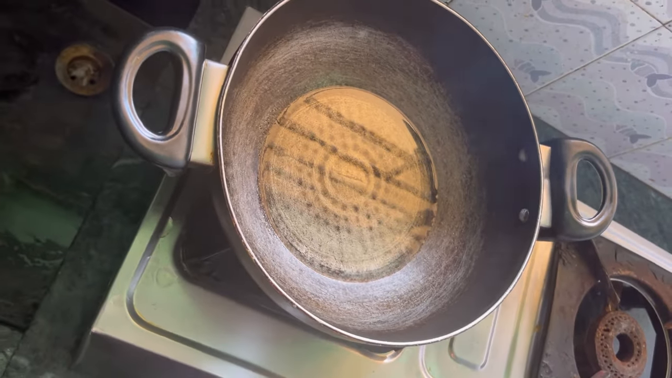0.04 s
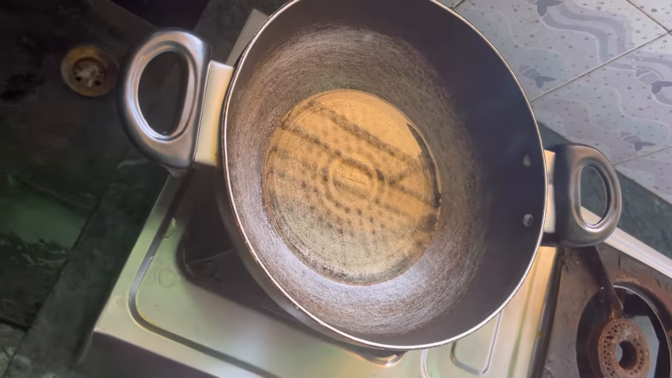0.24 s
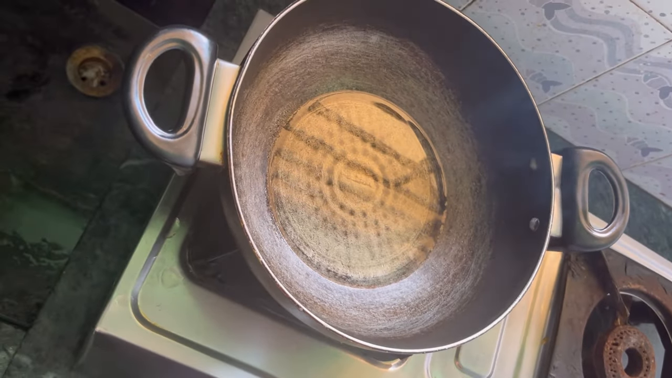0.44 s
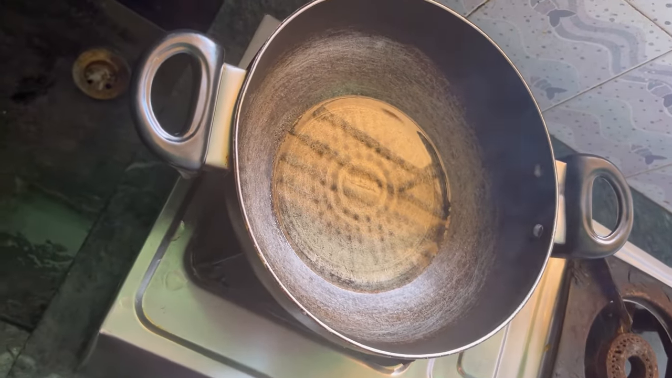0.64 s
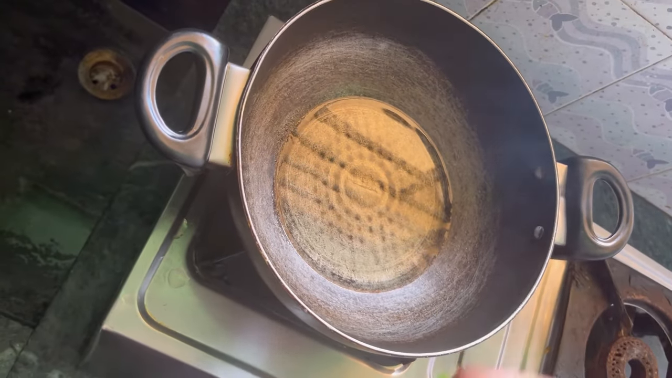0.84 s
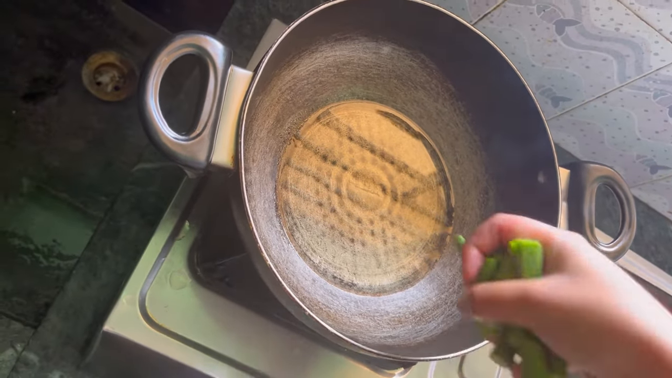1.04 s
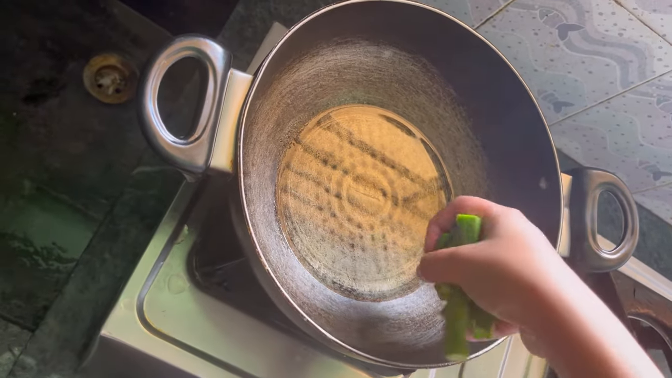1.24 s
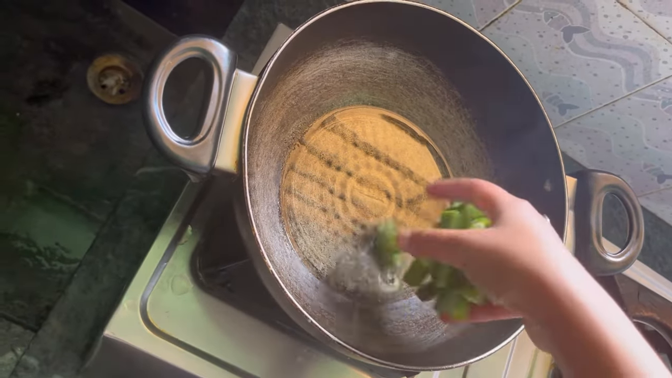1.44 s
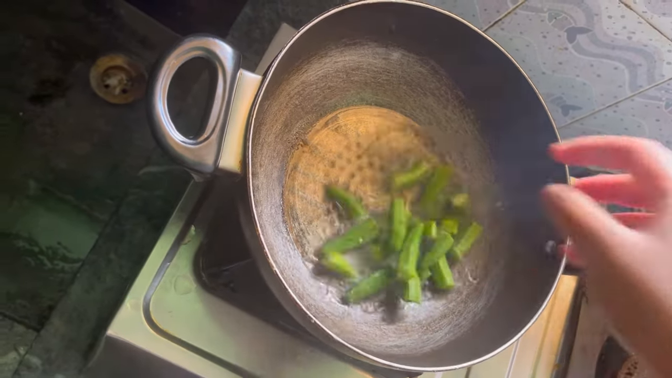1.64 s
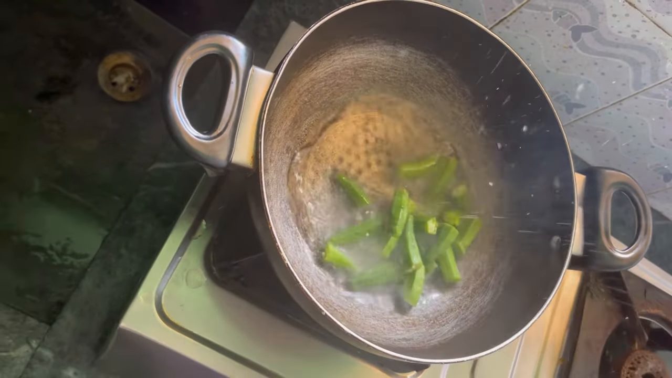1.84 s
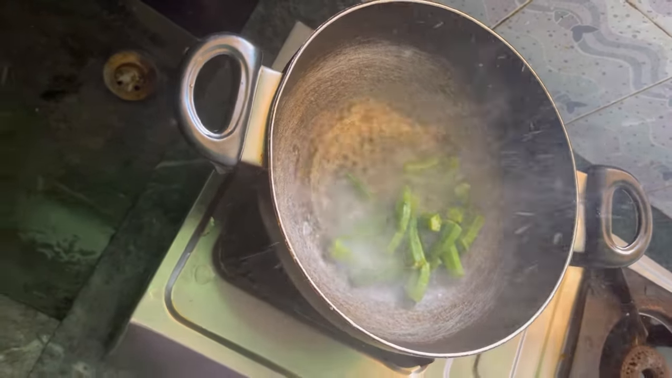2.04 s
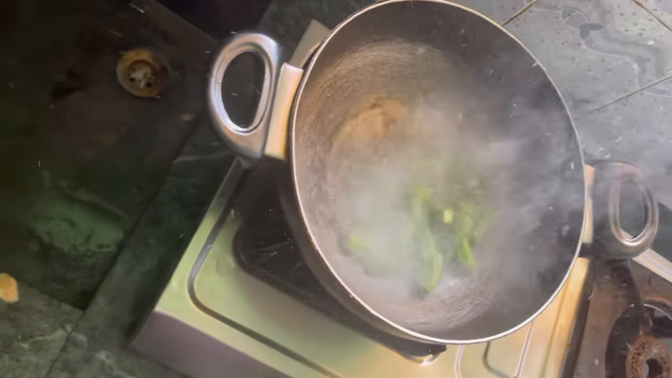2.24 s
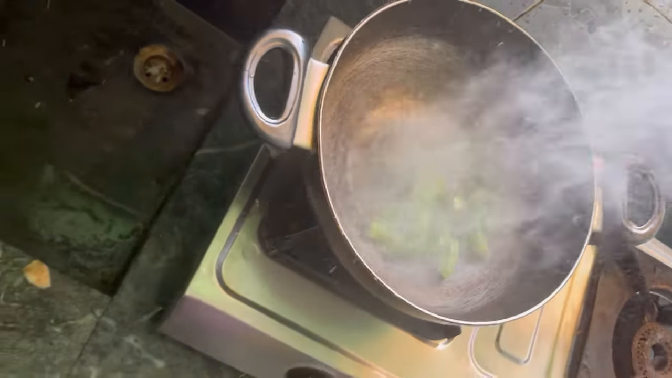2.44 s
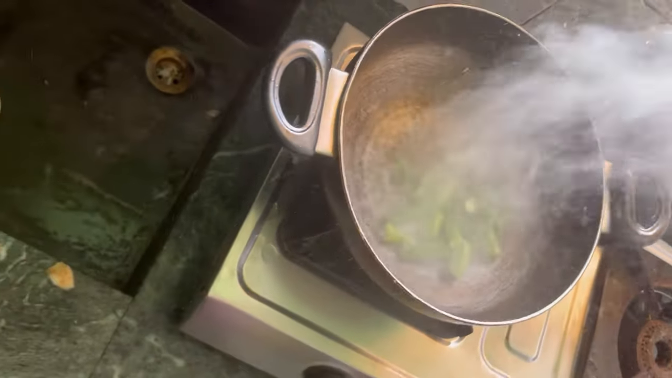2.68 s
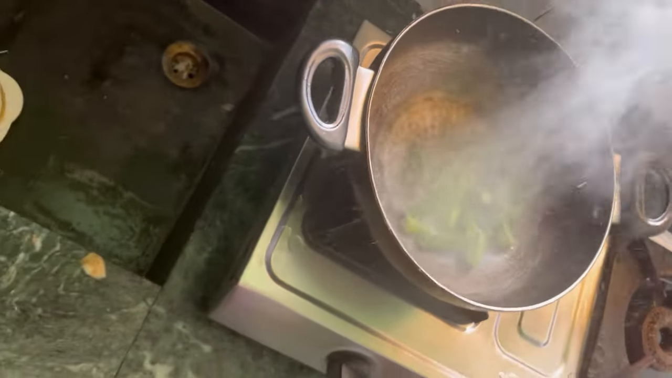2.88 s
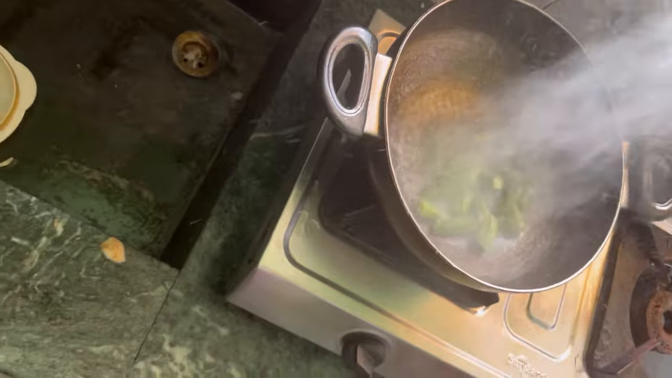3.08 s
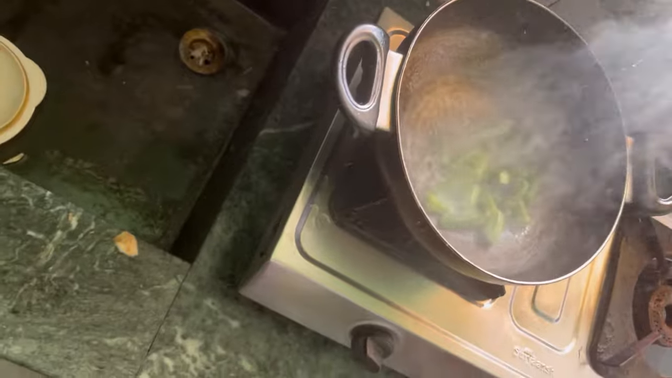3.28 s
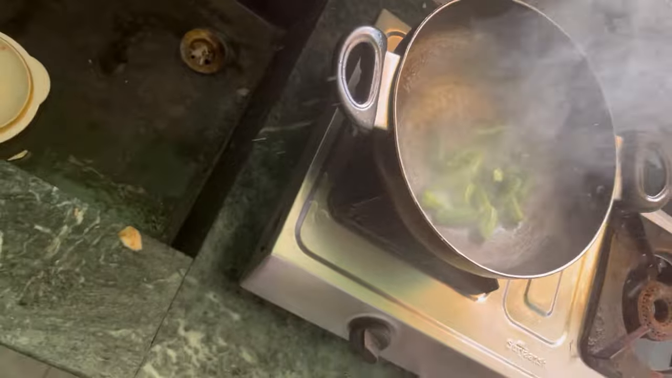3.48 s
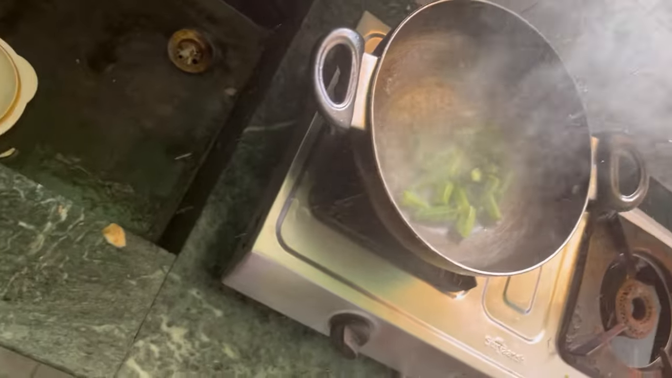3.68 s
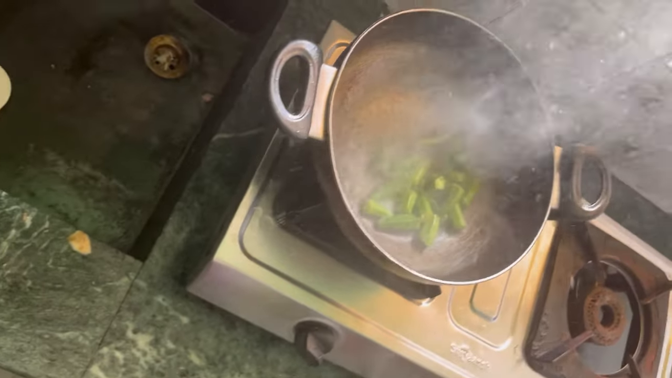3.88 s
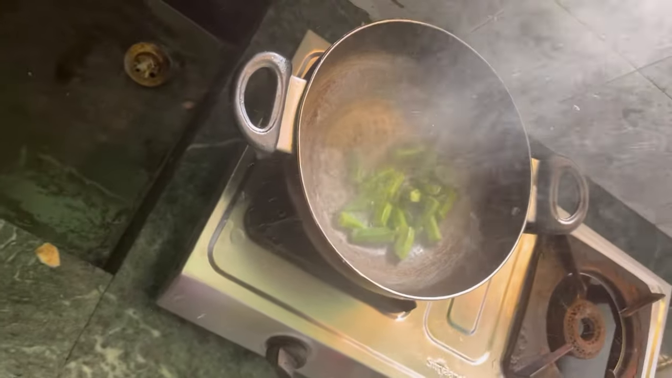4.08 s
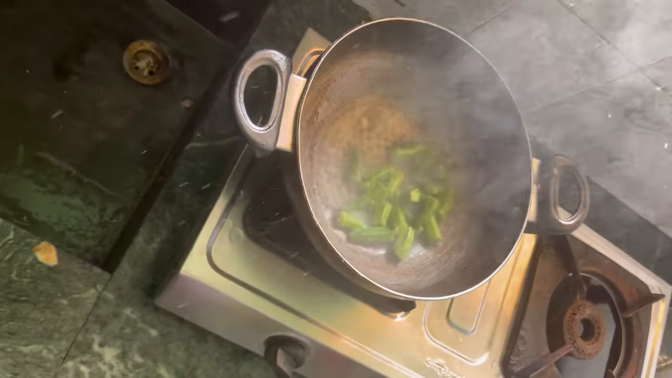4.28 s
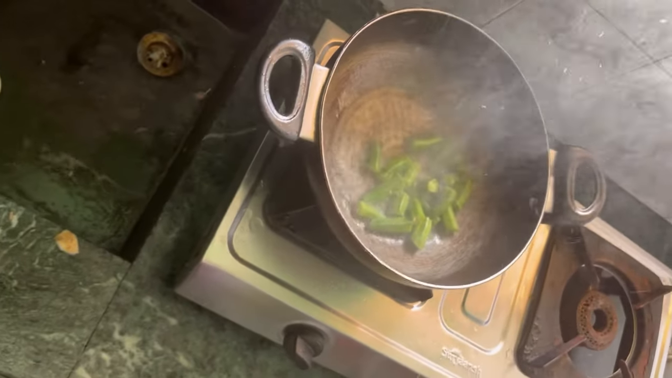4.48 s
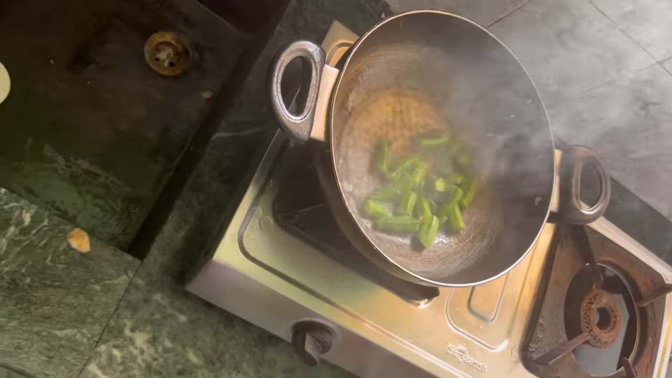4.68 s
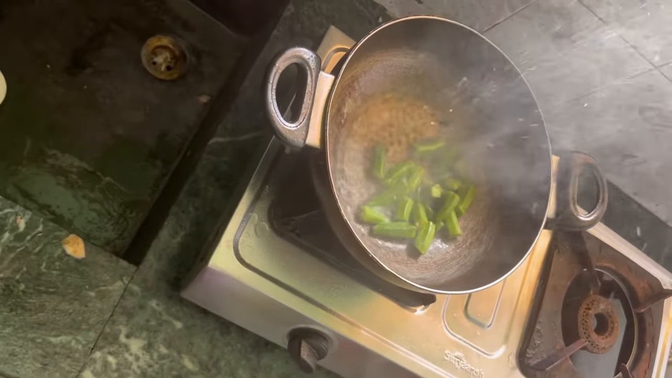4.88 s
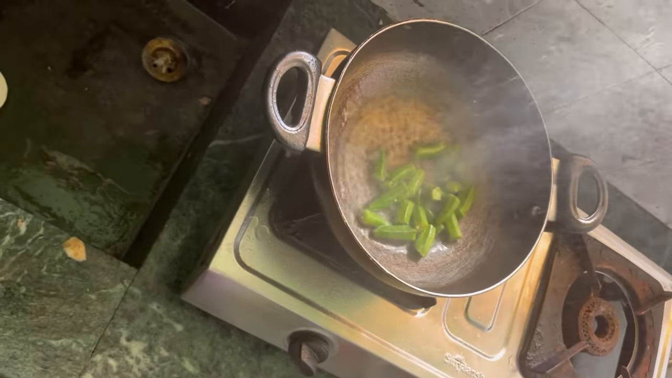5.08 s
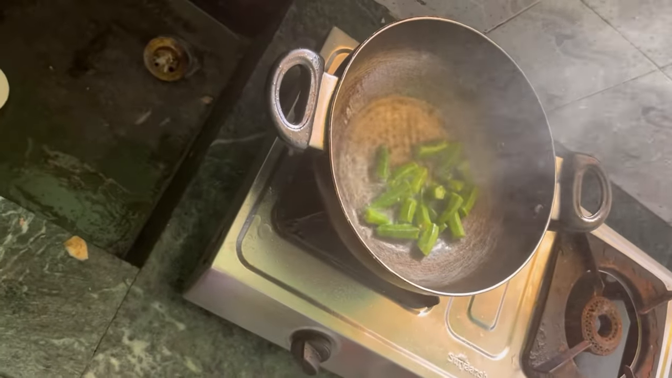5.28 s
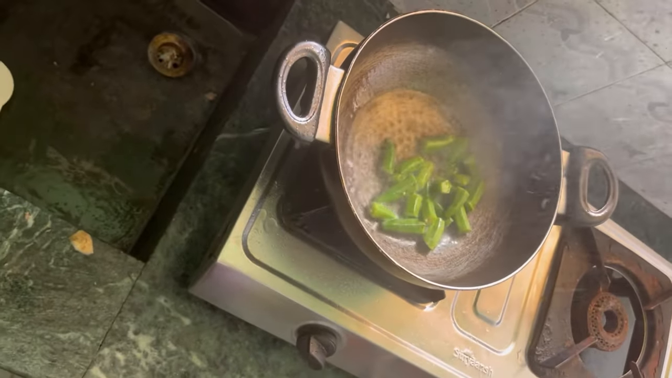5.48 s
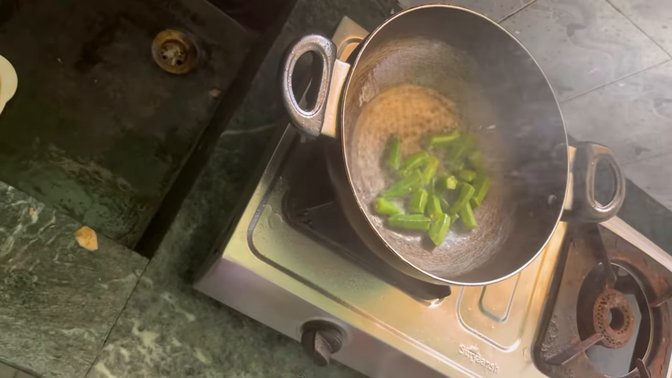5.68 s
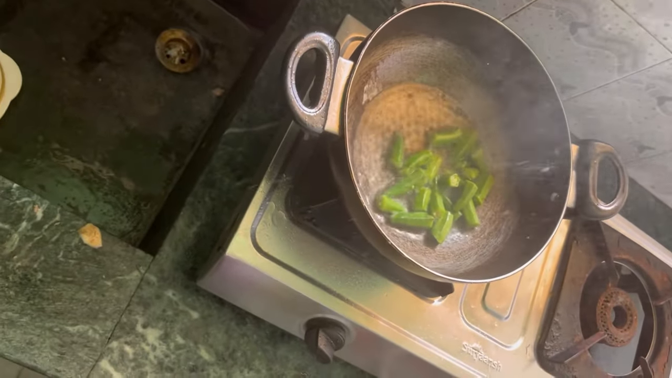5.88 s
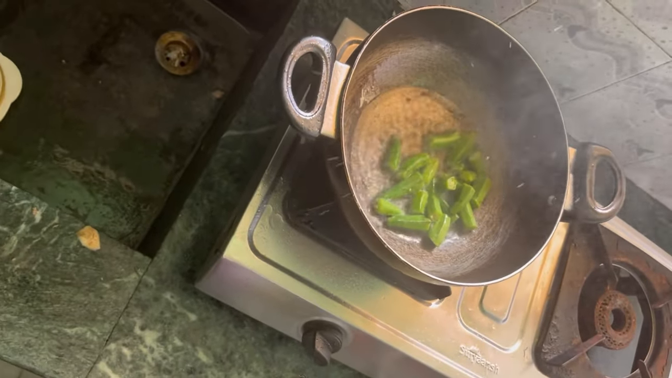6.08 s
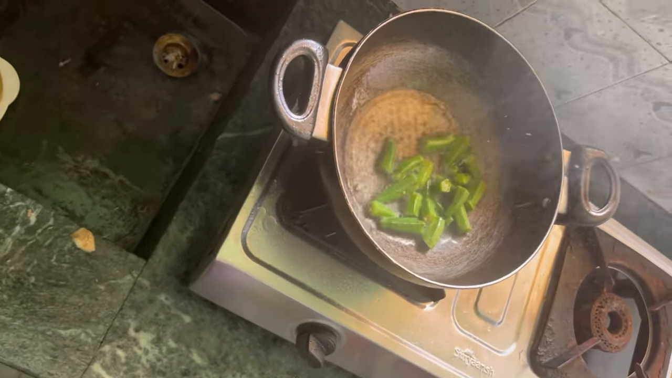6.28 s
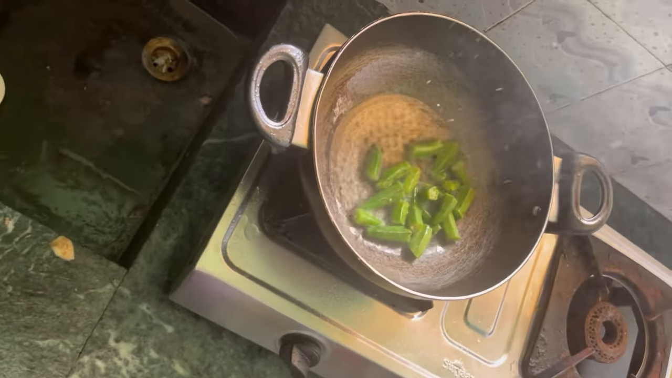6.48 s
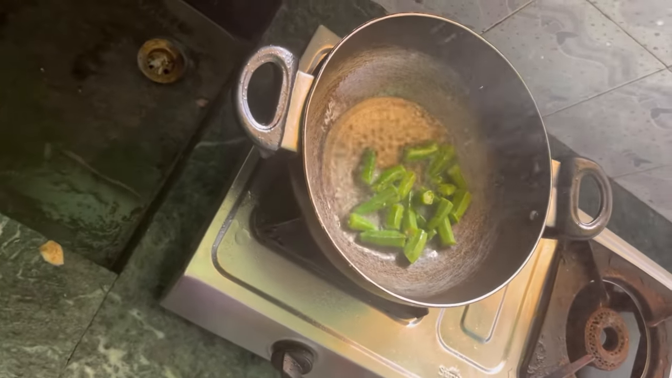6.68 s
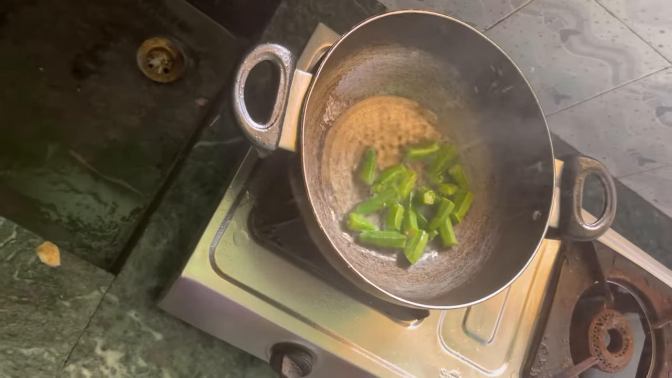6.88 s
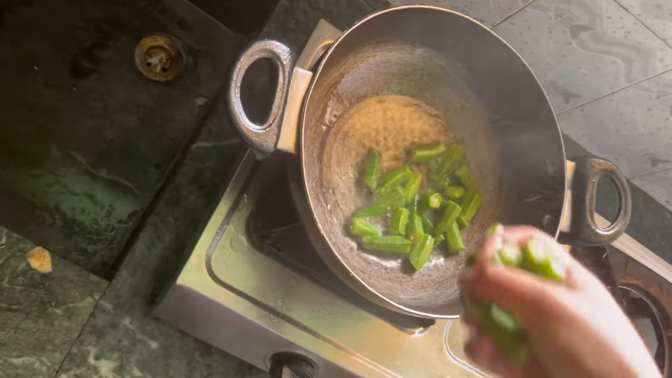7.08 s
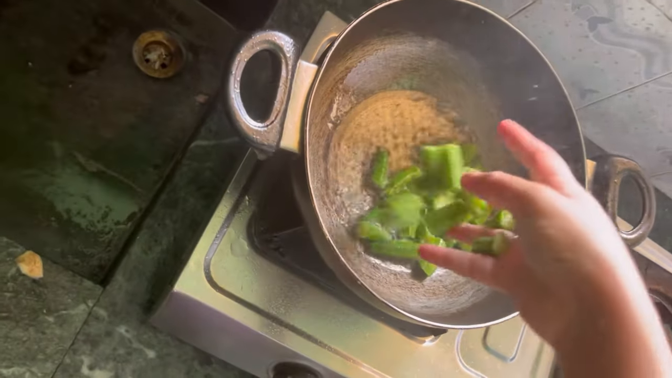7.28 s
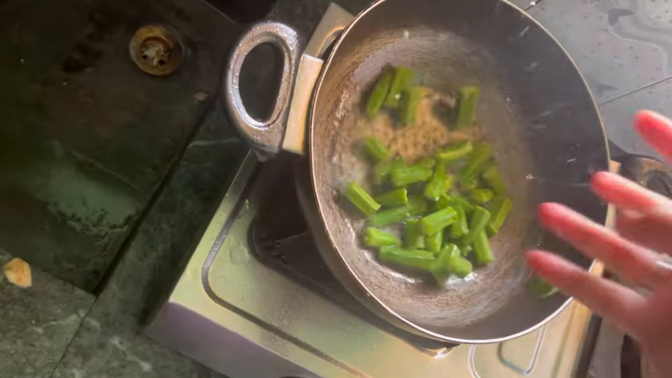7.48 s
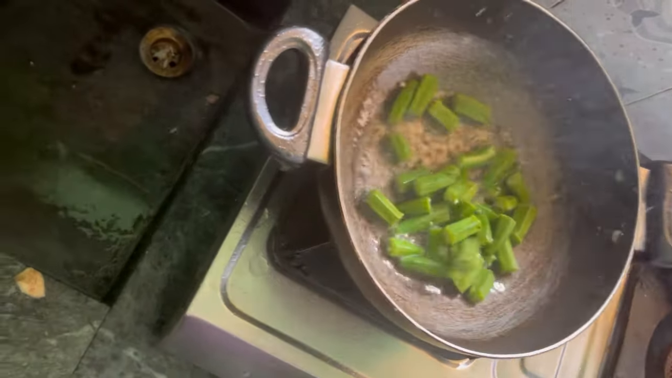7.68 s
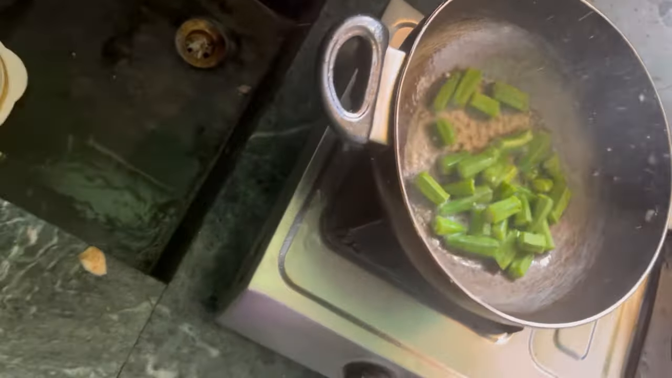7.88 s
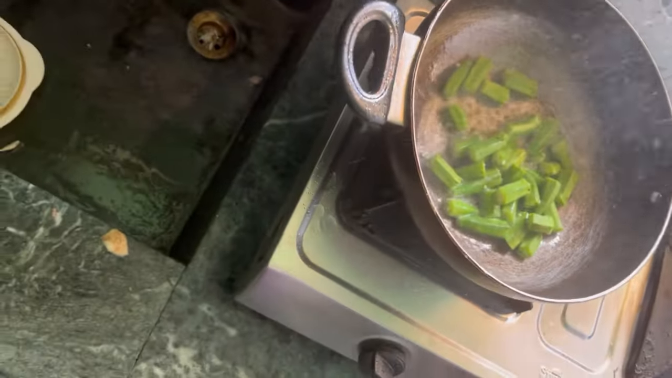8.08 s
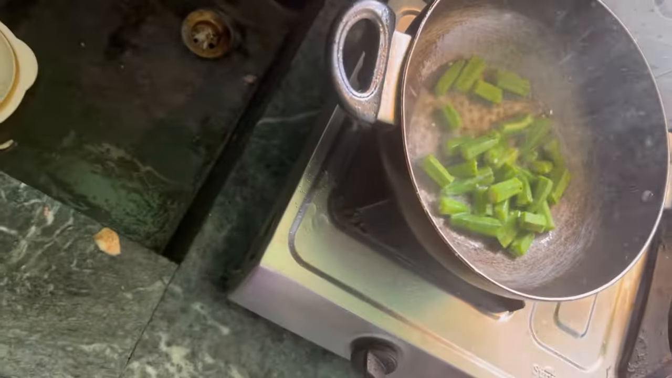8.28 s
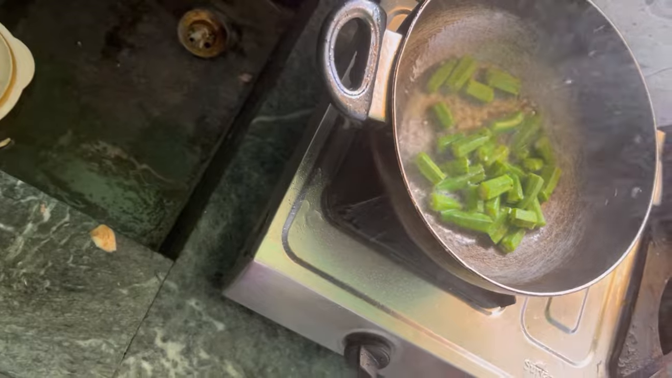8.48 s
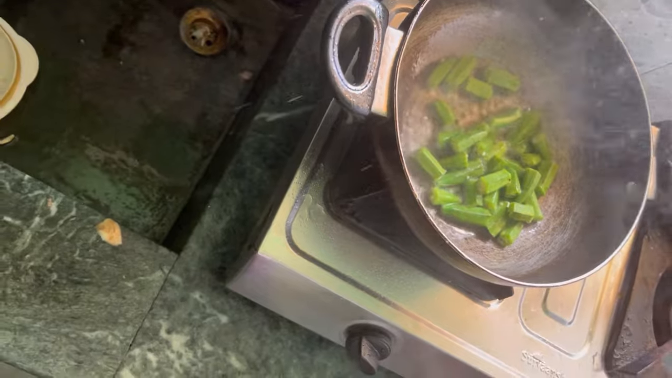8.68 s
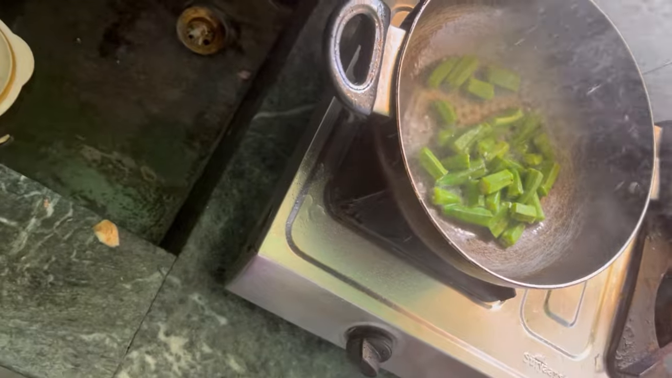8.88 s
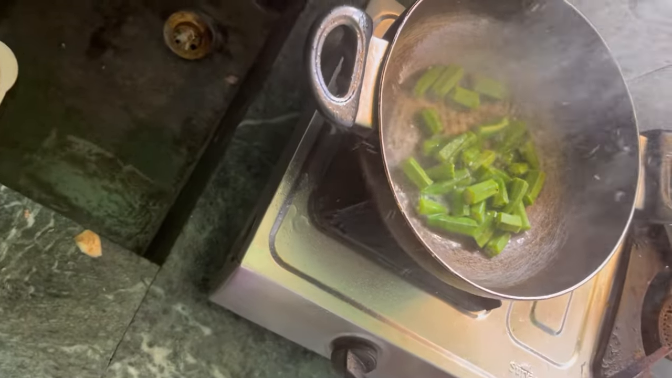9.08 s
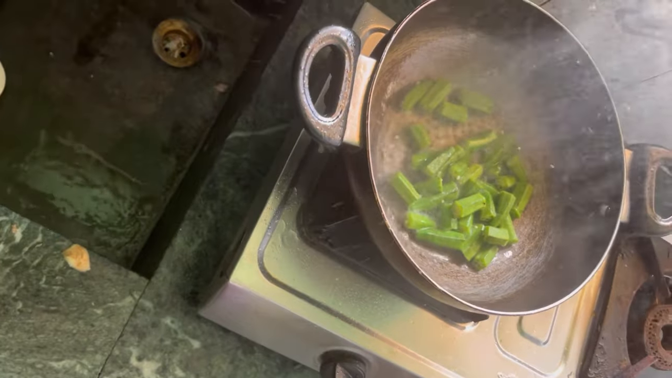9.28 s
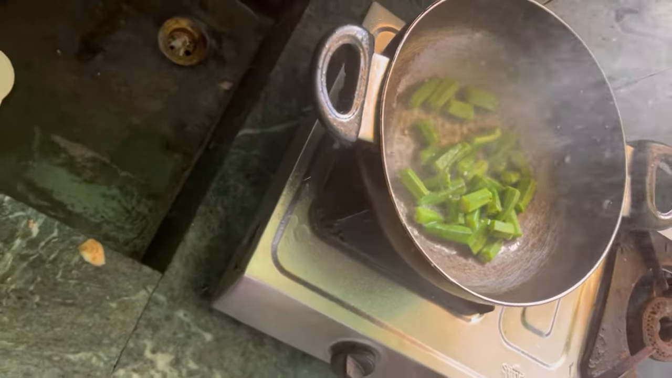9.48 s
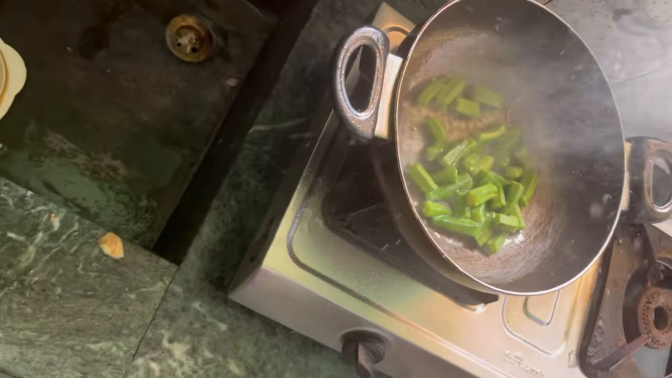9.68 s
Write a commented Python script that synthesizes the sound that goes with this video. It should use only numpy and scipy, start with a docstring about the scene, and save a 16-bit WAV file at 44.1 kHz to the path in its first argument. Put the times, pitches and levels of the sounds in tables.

```python
"""Wet okra frying: two handfuls are dropped into hot oil in a round metal pan on a gas stove.
Water flashes to steam: thousands of tiny noise bursts a second fizz, larger bubbles seethe below
and the finest sparkle above, while single drops spit with a crack, a ringing plop and a spray.
Soft bumps, a faint gas whine and a low kitchen rumble of shaped noise lie behind them.
A handheld pair of microphone ports hears the pan from above."""
import sys
import numpy as np
from scipy import signal
from scipy.fft import rfft, irfft, next_fast_len
from scipy.io import wavfile
from scipy.ndimage import uniform_filter1d

SR = 44100
rng = np.random.default_rng(int(sys.argv[2]) if len(sys.argv) > 2 else 0)


def store_wav(level_fs):
    """Save 16-bit WAV to argv[1]."""
    pcm = np.round(np.clip(np.atleast_2d(level_fs), -1, 1) * 32767)
    wavfile.write(sys.argv[1], SR, pcm.T.astype(np.int16))


N = 429534

# Vigour of the frying: first drops, one handful, then another. Each row: time in seconds,
# level of the fizz in dB before the spits stir it.
FRYING_LEVEL = [(1.408, -51), (1.418, -19), (1.432, -28), (1.447, -28.5), (1.542, -20.5), (1.555, -11.5),
                (1.576, -14), (1.62, -12.5), (1.7, -14.5), (2.05, -14.5), (2.3, -18), (3.05, -23.5),
                (3.7, -25), (4.6, -27.5), (5.0, -28.5), (6.0, -28.5), (7.2, -29), (7.36, -28.5), (7.5, -26),
                (8.5, -24), (9.3, -24), (9.74, -25)]
# Colours of the tiny bursts, the larger bubbles and the finest bursts; only their shape counts.
# Each row: frequency in Hz, relative density in dB per Hz.
FIZZ_SPECTRUM = [(1500, -42.5), (2300, -7.5), (2700, -7), (3300, -7.5), (4300, -4), (5200, -1), (6800, 1.5),
                 (7700, -2), (8800, -12.5), (10000, -41), (12000, -36)]
SEETHE_SPECTRUM = [(150, -18), (300, -12.5), (500, -4), (800, -1), (1100, -2), (1500, 1), (2200, 0.5),
                   (3000, 0), (4500, -12.5)]
SPARKLE_SPECTRUM = [(5000, -45), (8000, -16), (9300, -6), (10200, -3), (11600, 0), (15000, 0), (16500, -3)]
# Single drops that spit. Each row: start in seconds, crack peak in dB, plop minus crack in dB,
# spray minus crack in dB, plop pitch in Hz.
SPITTING_DROPS = [(0.562, -35.5, 5, -20, 1940), (1.4804, -14, -15, 8, 2000), (1.5254, -11, -5, 9, 2210),
                  (2.02, -9, 2, -8, 1500), (2.303, -12, -7, -9, 1530), (2.5521, -9, -21, -6, 1510),
                  (2.681, -2, -14, -8, 2290), (3.377, -22, -5, -15, 1450), (3.457, -7, -13, -10, 930),
                  (3.7296, -10, -15, -14, 2160), (4.126, -15, 1.5, -4, 1360), (4.18, -11.5, -6, -11, 1950),
                  (4.2144, -25, -14, -11, 1360), (4.774, -16.5, 0, -11, 790), (4.7904, -20, -13, -9, 1690),
                  (5.0338, -3.5, -15, -21, 1320), (5.255, -4, -11, -24, 1380), (5.498, -20.5, 6, -2, 1840),
                  (5.5094, -17, -8, -1, 1970), (5.934, -21, 4, -8, 610), (6.035, -12, -4, -5, 1990),
                  (6.1375, -20, -18, 3, 1260), (6.1843, -10, -5.5, -13, 1300), (6.3986, -12, -6, -10, 1600),
                  (6.548, -13, -9, -15, 1890), (6.5725, -12, -19, -13, 1270), (6.8905, -13, -31, 3, 1670),
                  (7.1454, -8, -18, -7, 1430), (7.1682, -10.5, -8, 2, 800), (7.2349, -10.5, -1.5, -6, 756),
                  (7.2864, -14, -19, -2, 2010), (7.3125, -6.5, -8, -5, 2020), (7.3324, -11, -3, -6, 720),
                  (7.352, -10, 2.5, -12, 800), (7.3695, -3.5, -3, -12, 2120), (7.392, -11.5, 1, -12, 784),
                  (7.485, -18, -8, 12, 940), (7.662, -12, -5, 1, 1450), (7.74, -13, -4, -4, 1360),
                  (7.7573, -9, -15, -3, 2010), (7.9448, -10, -19, -6, 1660), (8.008, -12, -11, -11, 1350),
                  (8.1, -9, -12, -6, 1400), (8.148, -18, -7, 9, 2130), (8.4447, -13, -11, -8, 1250),
                  (8.5, -4.5, -2.5, -11, 1310), (8.632, -10, -13, -7, 1370), (8.644, -10, -3, -8, 1390),
                  (8.6537, -3, -13, -22, 900), (8.7254, -9, 0, -10, 865), (8.758, -15, 2, -11, 840),
                  (8.927, -7, -8, -11, 2070), (9.0415, -11, -4, -11, 850), (9.1, -11, 1, 2, 780),
                  (9.1267, -6, -10, -10, 2090), (9.3594, -3, -10, -2, 2020), (9.424, -7, -9, -11, 1770),
                  (9.5094, -10, -1, 4, 1560), (9.5791, -7, -20, -17, 2200)]
CALMEST_DB = -34   # frying below this level counts as this calm when its bursts and flares are set


def frying():
    """Seethe, fizz and sparkle surge together as pockets of water boil off; a harder boil is denser."""
    # The first small drops are thin; the fizz under 4.5 kHz fills in with the handful.
    # Each row: time in seconds, gain of that lower fizz in dB.
    low_fill = [(1.41, -8.5), (1.5, -2), (1.56, 0.5)]
    seethe_db, seethe_lag_s = -10, 0.05   # larger bubbles: level against the fizz, lag behind it
    sparkle_db, thin_sparkle = -4, 1      # level against the fizz, dB gained per dB of missing fill
    calm = 0.18                           # the harder the boil, the more its surges even out

    fizz_db = in_time(FRYING_LEVEL, left=-120)
    fill_db = in_time(low_fill)
    r = np.exp(-1 / (seethe_lag_s * SR))
    seethe_gain = from_db(seethe_db) * signal.lfilter([1 - r], [1, -r], from_db(fizz_db))
    sparkle_gain = from_db(fizz_db + sparkle_db - thin_sparkle * fill_db)

    busy = from_db(.8 * (np.maximum(fizz_db, CALMEST_DB) + 29))   # factor on the burst rates
    surge_db = (0.88 * drift(8.3) + 1.0 * drift(20.0)) / busy ** calm

    fizz = bursts(4000. * busy, 3.03, smooth=0.99, last_s=0.00024)
    fizz = colour(fizz * from_db(surge_db + 0.18 * drift(31.0)), FIZZ_SPECTRUM)
    lower = signal.sosfilt(signal.butter(2, 4500, fs=SR, output="sos"), fizz)
    fizz = fizz + (from_db(fill_db) - 1) * lower

    seethe = bursts(1500. * busy, 3.3, smooth=1.0, last_s=0.00052)
    seethe = colour(seethe * from_db(0.7 * surge_db + 0.9 * drift(26.0)), SEETHE_SPECTRUM)

    sparkle = bursts(3500. * busy, 3.95, smooth=0.9, last_s=0.00017)
    sparkle = colour(sparkle * from_db(0.47 * surge_db + 1.26 * drift(23.0)), SPARKLE_SPECTRUM)

    layers = (from_db(fizz_db), fizz), (seethe_gain, in_room(seethe)), (sparkle_gain, sparkle)
    # slow changes of level are evened out, so that the gains alone set them
    return flares(fizz_db) * sum(gain * rms_one(x / slow_level(x)) for gain, x in layers)


def bursts(per_s, spread_db, smooth, last_s):
    """Uneven random noise flashes, power dying by 1/e in last_s, over smooth noise; two unrelated draws."""
    sizes = from_db(spread_db * np.minimum(rng.exponential(1, N), 6))
    chance = np.clip(per_s / SR, 0, 1)
    struck = rng.random(N) < chance
    power = sizes ** 2 * struck / chance   # rarer bursts are stronger, so the mean power holds
    decay = np.exp(-1 / (last_s * SR))
    flashes = np.sqrt(signal.lfilter([1], [1, -decay], power + 1e-18))
    # both draws share one envelope of flashes
    return rms_one(flashes) * rng.standard_normal((2, N)) + smooth * rng.standard_normal((2, N))


def flares(fizz_db):
    """Gain on the frying: each spit stirs the oil and adds power that dies away."""
    flare_db, flare_s = -25., .035   # fizz added against the spit's peak, time to 1/e of the power
    s, peak_db = np.transpose(SPITTING_DROPS)[:2]
    kicks = np.zeros(N)
    kicks[(s * SR).astype(int)] = from_db(peak_db + flare_db) ** 2
    r = np.exp(-1 / (flare_s * SR))
    added = signal.lfilter([1], [1, -r], kicks + 1e-18)
    return np.sqrt(1 + added / from_db(np.maximum(fizz_db, CALMEST_DB)) ** 2)


def spitting():
    """A drop bursts with a crack, a lower plop that rings briefly at its pitch and a fine spray."""
    plop_cycles = 3.5   # the ring falls by 60 dB in this many cycles
    s, peak_db, plop_db, spray_db, hz = np.vstack([SPITTING_DROPS, small_spits()]).T
    cycles = np.repeat(hz, 2)[:, None] * np.arange(512) / SR
    rings = 0.1 * np.sin(2 * np.pi * cycles) * from_db(-60 * cycles / plop_cycles)
    crack = puffs(s, peak_db, .0003, .008, snap=1.0, spectrum=FIZZ_SPECTRUM, size=512)
    plop = puffs(s, peak_db + plop_db, .0004, 0.01, snap=0.9, spectrum=SEETHE_SPECTRUM,
                 size=512, rings=rings)
    spray = puffs(s, peak_db + spray_db, 0.0006, 0.0035, snap=0.4, spectrum=SPARKLE_SPECTRUM, size=512)
    return crack + plop + spray


def small_spits(count=100):
    """Lesser drops at random, in rows like SPITTING_DROPS, as loud as the frying is lively."""
    per_s, over_fizz_db = 9., 12.5   # mean rate, middle of the peaks over the fizz
    when, kept, size, low, high, pitch = rng.random((count, 6)).T
    first_s = FRYING_LEVEL[0][0]
    span_s = N / SR - first_s
    s = first_s + when * span_s
    db = np.interp(s, *np.transpose(FRYING_LEVEL)) + over_fizz_db + 9 * (size - .5)
    db = np.where(kept < per_s * span_s / count, db, -120)   # thinned to the rate
    return np.transpose([s, db, -20 + 14 * low, -14 + 12 * high, 750 + 1400 * pitch])


def puffs(times, peaks_db, rise, t60, snap, spectrum, size, rings=0):
    """At each moment a snap, a puff of noise that swells and dies and perhaps a ring; two draws."""
    out = np.zeros((2, N + 2 * size))
    t = np.arange(size) / SR
    envelope = (1 - np.exp(-t / rise)) * from_db(-60 * t / t60)
    rows = rng.standard_normal((2 * len(times), size)) * envelope
    rows = rows / np.sqrt(np.sum(rows ** 2, axis=1, keepdims=True)) + rings
    rows[:, 0] += snap   # a one-sample click
    rows = colour(rows, spectrum, size=4 * size)
    rows /= np.abs(rows).max(axis=1, keepdims=True)
    pairs = rows.reshape(len(times), 2, -1)[..., :2 * size]
    for s, db, puff in zip(times, peaks_db, pairs):
        at = round(s * SR)
        out[:, at:at + 2 * size] += from_db(db) * puff
    return out[:, :N]


def bumps():
    """Dull bumps of the hand and of steam on the ports: a soft low push for each."""
    # Each row: start in seconds, peak in dB.
    bump_moments = [(1.678, -32), (1.72, -27), (2.032, -37), (2.518, -28), (3.029, -42), (4.058, -44),
                    (4.607, -41), (7.131, -41), (7.73, -37), (7.908, -32), (8.488, -35.5), (9.419, -33.5)]
    # Colour of a push. Each row: frequency in Hz, relative density in dB per Hz.
    bump_spectrum = [(20, -15), (45, -1), (90, 0.5), (200, -9.5), (400, -30), (1000, -73)]
    s, db = np.transpose(bump_moments)
    return puffs(s, db, 0.0043, 0.12, snap=0.86, spectrum=bump_spectrum, size=4096)


def gas_jet():
    """Faint whines of the gas jet: noise narrowed twice by each resonance, swelling slowly."""
    # Each row: frequency in Hz, width of one resonance in Hz, middle level in dB.
    jet_whines = [(3400, 40, -77), (4500, 40, -71)]
    noise = rng.standard_normal((2, N))
    total = 0
    for hz, width, db in jet_whines:
        whine = resonate(resonate(noise, hz, width), hz, width)
        total = total + from_db(db + 2 * drift(1.4)) * rms_one(whine)
    return total


def kitchen():
    """Room noise of flame, street and appliances: shaped noise whose level drifts."""
    # Colour of the room. Each row: frequency in Hz, relative density in dB per Hz.
    kitchen_spectrum = [(20, -35), (40, -28), (62, -6), (140, -8), (300, -15.5), (760, -21), (3180, -29),
                        (4600, -33), (5800, -34), (8000, -45), (9000, -55), (14000, -52), (16000, -73)]
    # Low rumble. Each row: time in seconds, level in dB about which it drifts.
    rumble_level = [(0, -44.5), (1.9, -45), (3.0, -49.5), (5.8, -54.5), (7.6, -50), (9.0, -50),
                    (9.74, -47.5)]
    noise = colour(rng.standard_normal((2, N)), kitchen_spectrum, size=16384)
    return from_db(in_time(rumble_level) + .7 * drift(9.0)) * rms_one(in_room(noise))


def in_room(x):
    """The room favours some low pitches and hollows others, each in turn."""
    # Each row: frequency in Hz, width in Hz, gain at that pitch in dB.
    room_pitches = [(96, 18, 7), (117, 12, -7), (131, 11, 7), (187, 16, -8), (225, 25, 4), (250, 18, 6),
                    (290, 40, -3), (330, 22, 5), (390, 20, 4), (430, 30, -5), (464, 35, 4), (630, 25, -5),
                    (659, 35, 4), (820, 22, 4), (860, 30, -3)]
    for hz, width, db in room_pitches:
        x = x + (from_db(db) - 1) * resonate(x, hz, width)
    return x


def resonate(x, hz, width):
    """One two-pole resonance, gain about 1 on top."""
    r = np.exp(-np.pi * width / SR)
    feed = [(1 - r * r) / 2, 0, (r * r - 1) / 2]
    return signal.lfilter(feed, [1, -2 * r * np.cos(2 * np.pi * hz / SR), r * r], x)


def colour(x, spectrum, size=4096):
    """Causal filter with the given spectrum: minimum phase from the folded cepstrum."""
    gain = from_db(at_hz(spectrum, np.arange(size // 2 + 1) * SR / size))
    ceps = irfft(np.log(gain))
    ceps[1:size // 2] *= 2
    ceps[size // 2 + 1:] = 0
    impulse = irfft(np.exp(rfft(ceps)))
    return signal.oaconvolve(x, impulse[None], axes=1)[:, :N]


def drift(rate):
    """Slow chance of rms 1: noise through two equal low-pass poles at rate Hz."""
    r = np.exp(-40 * np.pi * rate / SR)   # drawn at every 20th sample
    slow = signal.lfilter([1], [1, -2 * r, r * r], rng.standard_normal(N // 20 + 4002))[4000:]
    return np.interp(np.arange(N) / 20, np.arange(len(slow)), rms_one(slow))


def from_db(db):
    """Decibels to gain."""
    return 10 ** (np.asarray(db) / 20)


def rms_one(x):
    """Scaled to rms 1."""
    return x / np.sqrt(np.mean(x ** 2) + 1e-20)


def slow_level(x):
    """Rms level of x over a sliding second."""
    return np.sqrt(uniform_filter1d(np.mean(x ** 2, axis=0), SR) + 1e-20)


def in_time(rows, left=None):
    """A level curve at every sample."""
    return np.interp(np.arange(N) / SR, *np.transpose(rows), left=left)


def at_hz(points, hz, axis=1):
    """A column of a spectrum table on a log-frequency axis."""
    p = np.array(points)
    return np.interp(np.log(np.maximum(hz, 1)), np.log(p[:, 0]), p[:, axis])


def scene():
    """The right port hears part of what the left hears, lagging, and part by other paths in the pan."""
    # Between the ports. Each row: frequency in Hz, likeness from 0 to 1, right minus left in dB.
    port_pair = [(50, 1, 0.5), (199, 0.99, 2), (517, 0.86, 4), (790, 0.44, 6), (1500, 0.92, 0.5),
                 (2640, 0.69, 0.5), (3200, 0.67, 0.5), (3920, 1, -1), (4220, 0, -3), (4950, 0.9, 7.5),
                 (5150, 1, 0), (8700, 1, -0.5), (16000, 1, 0.5)]
    # A steady lag in the treble, bent by the housing below.
    # Each row: frequency in Hz, phase of the right port in radians.
    port_phase = [(0, 0), (520, .8), (860, 0), (1550, 0), (1900, -.5), (2250, -1.8), (2900, -2.7),
                  (3600, -1.1), (5000, -1.45), (6030, -3.14), (8200, -6.28), (10350, -9.42),
                  (12500, -12.57), (14800, -15.71), (16500, -18.1)]
    size = next_fast_len(N + 4096)
    shared, other = rfft(frying() + spitting() + bumps() + gas_jet() + kitchen(), size)
    hz = np.arange(size // 2 + 1) * SR / size
    alike = np.clip(at_hz(port_pair, hz), 0, 1)
    lean = from_db(at_hz(port_pair, hz, axis=2) / 2)   # half the difference goes to each port
    lag = np.exp(1j * np.interp(hz, *np.transpose(port_phase)))
    right = (alike * shared + np.sqrt(1 - alike ** 2) * other) * lag
    return irfft(np.array([shared / lean, right * lean]), size)[:, :N]


def record(dry):
    """The recorder rounds the peaks, then a steep low-pass cuts the top of the treble."""
    top, cutoff_hz = .72, 15750   # swing at which the rounding saturates, edge of the treble
    soft = top * np.tanh(dry / top)
    return signal.sosfilt(signal.ellip(16, .5, 100, cutoff_hz, fs=SR, output="sos"), soft)


dry = scene()
out = record(dry)
store_wav(out)
```